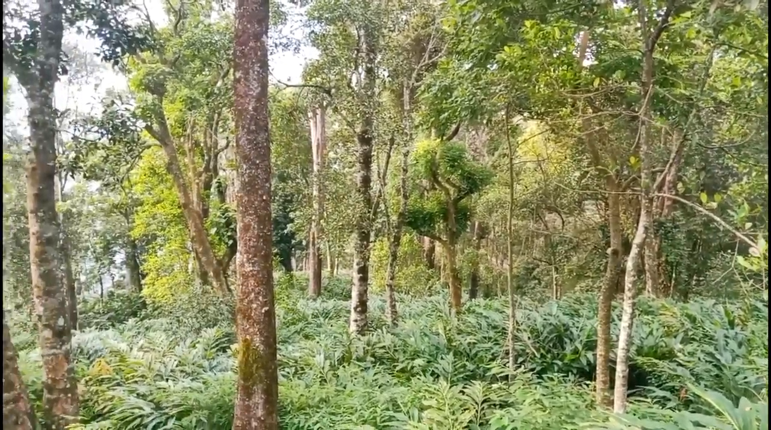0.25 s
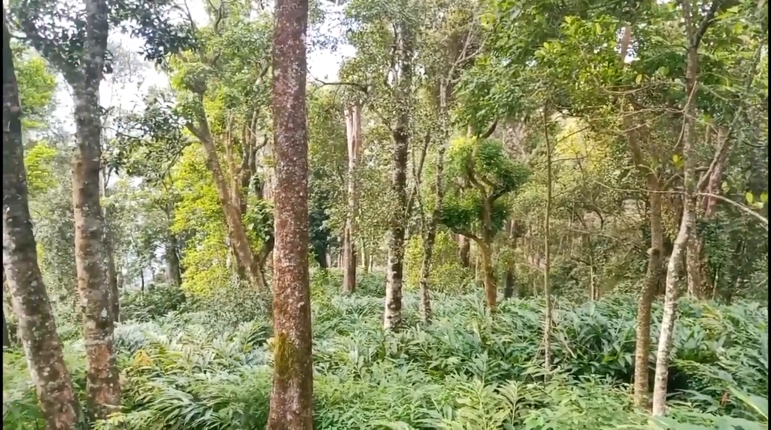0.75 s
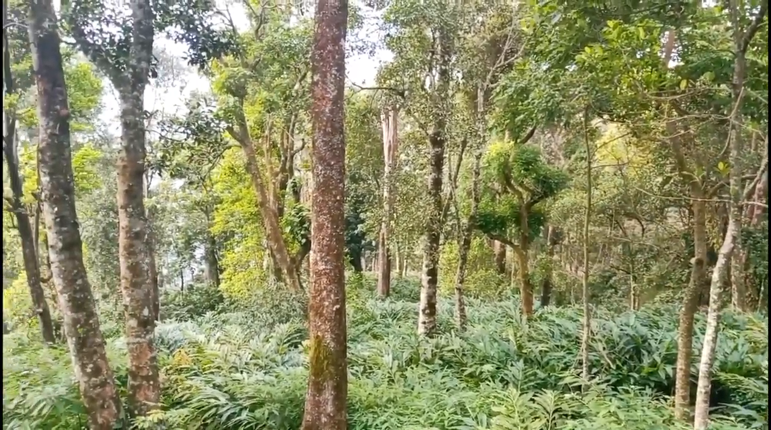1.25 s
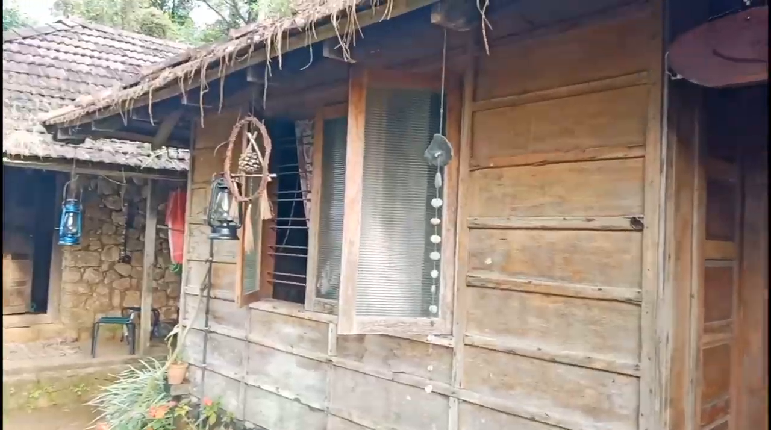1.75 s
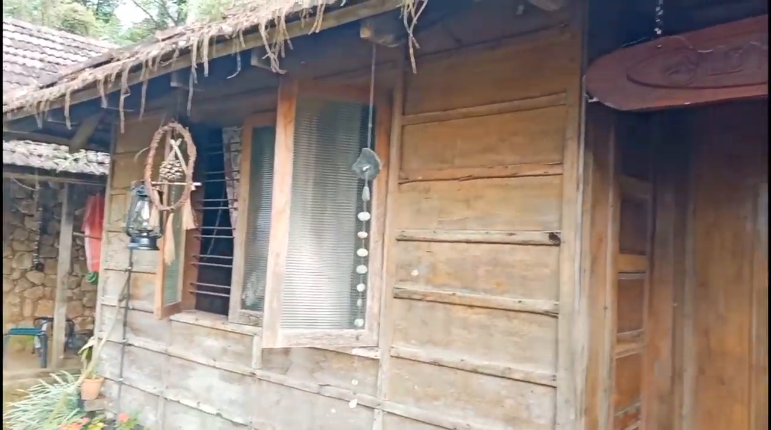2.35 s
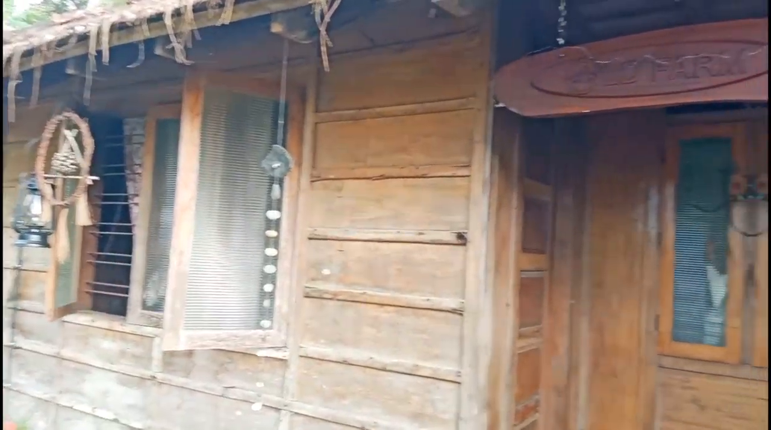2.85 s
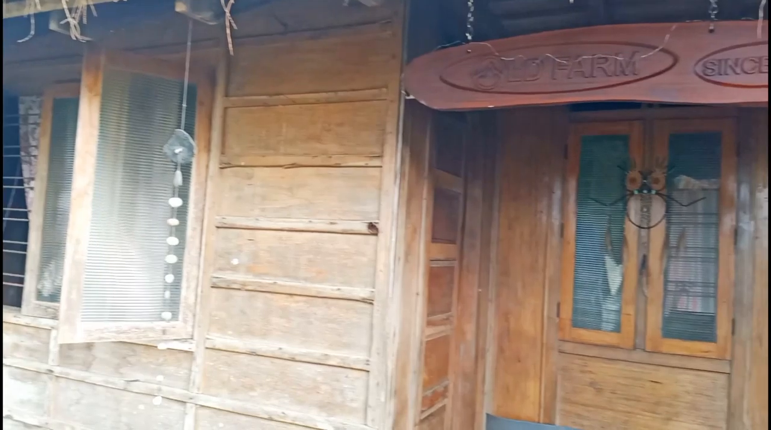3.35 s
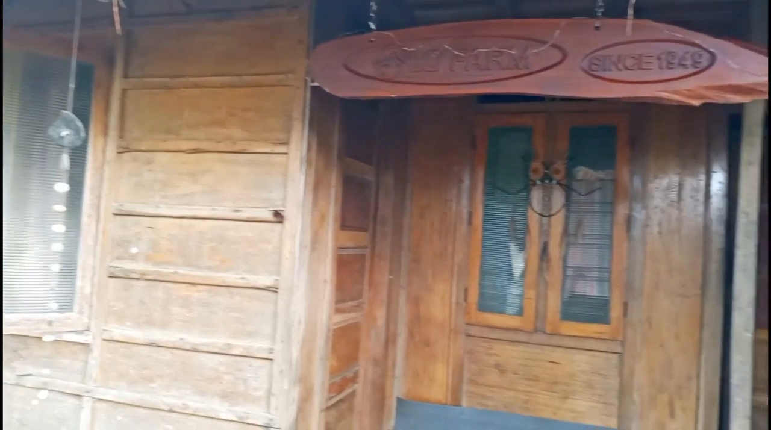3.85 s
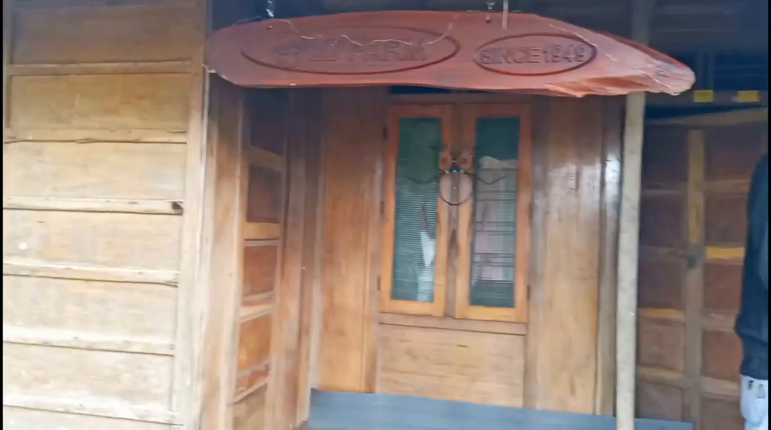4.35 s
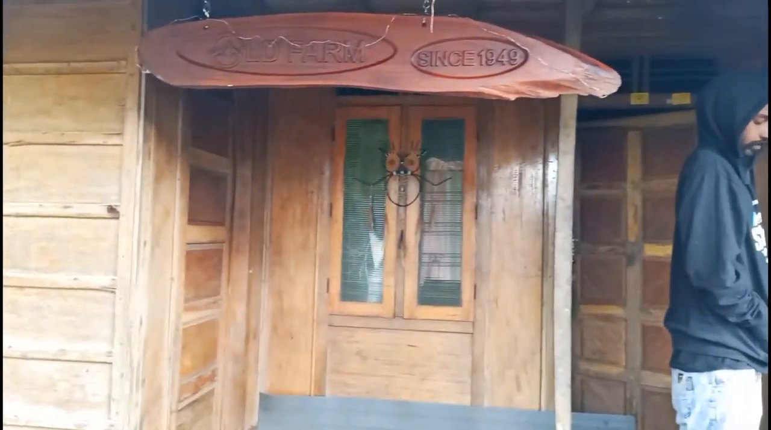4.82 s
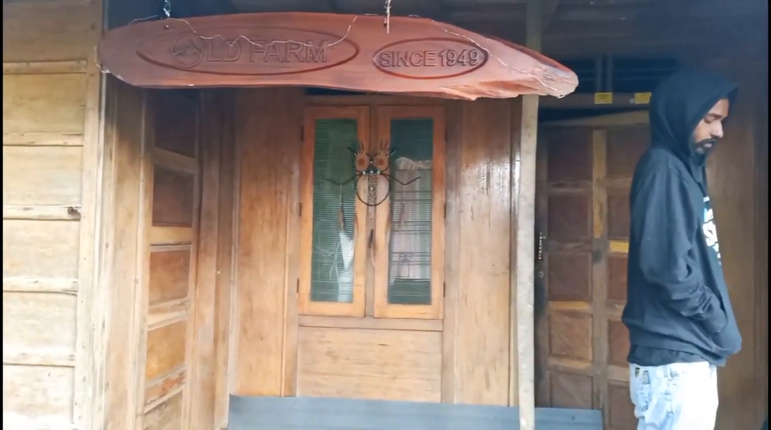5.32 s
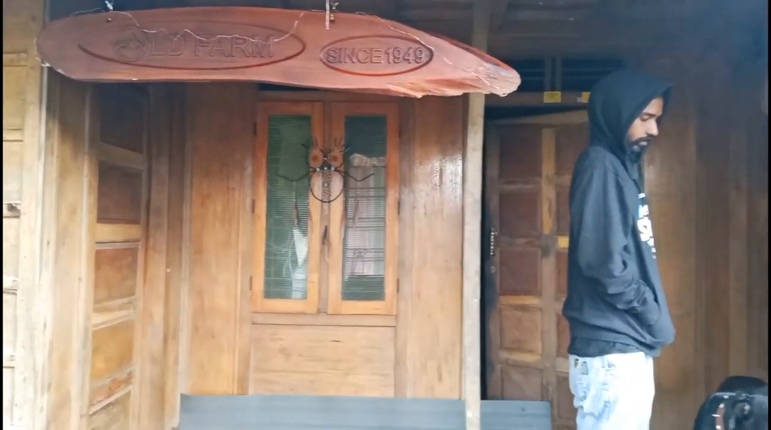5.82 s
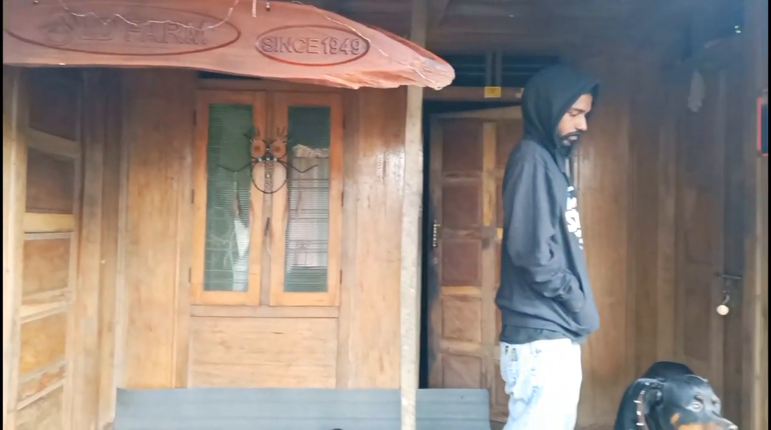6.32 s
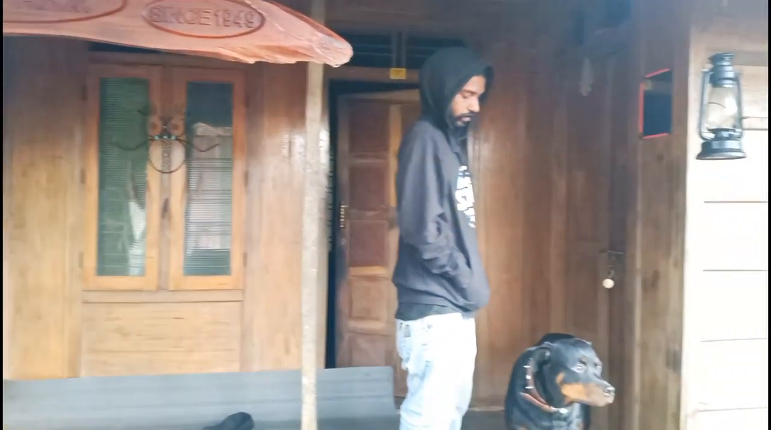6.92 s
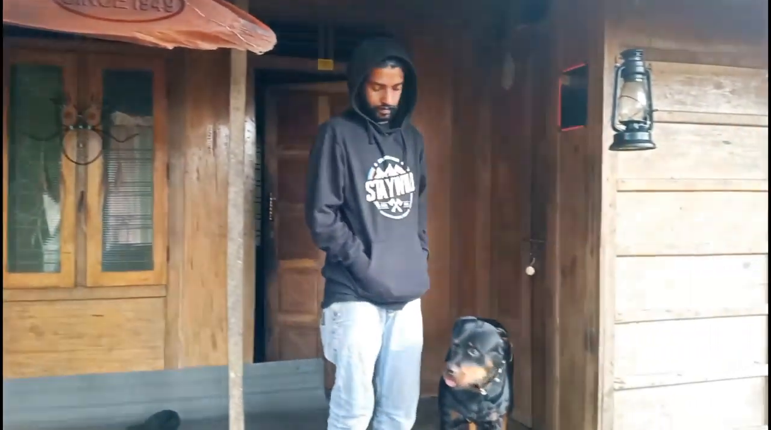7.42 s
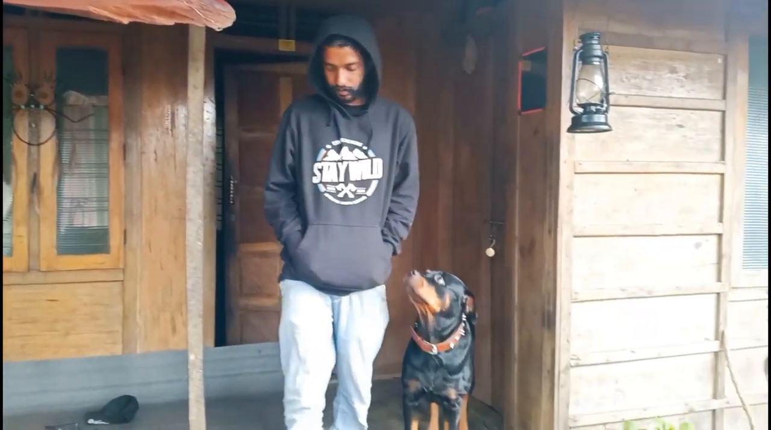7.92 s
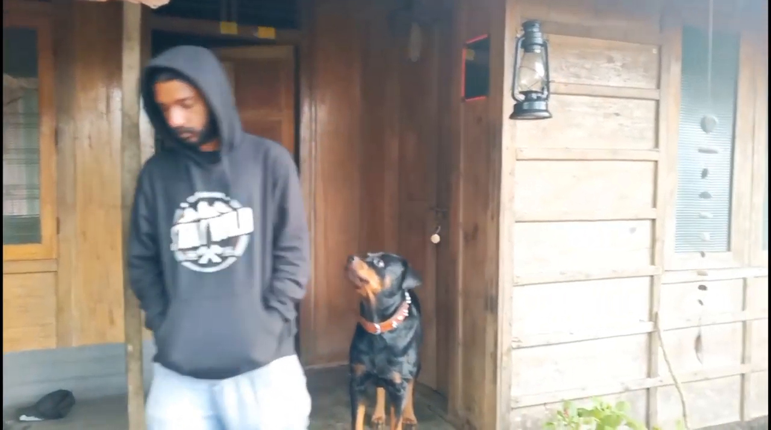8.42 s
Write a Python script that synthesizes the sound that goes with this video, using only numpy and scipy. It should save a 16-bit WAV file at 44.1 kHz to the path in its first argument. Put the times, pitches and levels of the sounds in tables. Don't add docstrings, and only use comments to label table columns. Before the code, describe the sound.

Outdoors, woodland birds whistle and coo with long airy reverberation, their far chorus growing until an abrupt cut. After a tiny gap, porch air and faint motor hum fade in. A wooden door bangs and rattles early, followed by sparse clicks, hollow knocks, cloth and shoe scuffs, and light claw pings beneath yard birds and a recurring rising songbird phrase. A double wooden footfall clacks close to the end, heard through a small handheld microphone.

```python
import sys
import numpy as np
from scipy import signal
from scipy.fft import rfft, irfft
from scipy.io import wavfile
from scipy.ndimage import uniform_filter1d, map_coordinates

SR = 44100
rng = np.random.default_rng(int(sys.argv[2]) if len(sys.argv) > 2 else 0)


def persist_wave(psi):
    counts = np.round(np.clip(psi, -1, 1) * 32767).astype(np.int16)
    wavfile.write(sys.argv[1], SR, np.atleast_2d(counts).T)


def voltage_ratio(level):
    return 10 ** (np.asarray(level, float) / 20)


N = 382343
T = np.arange(N) / SR
FOREST_END_S, PORCH_START_S, PORCH_FULL_S = 1.4705, 1.487, 1.86
# [f/Hz, t60/s]
TRUNKS = [(800, 1), (3000, 0.76), (7000, 0.51), (14000, 1)]


def unit(x):
    return x / np.sqrt(np.mean(x ** 2) + 1e-20)


def along(points, hz):
    f, value = np.transpose(points)
    return np.interp(np.log(hz + 1), np.log(f + 1), value)


def level_curve(points):
    s, db = np.transpose(points)
    return voltage_ratio(np.interp(T, s, db, left=-150, right=-150))


def wobble(rate):
    knots = rng.standard_normal(int(N * rate / SR) + 4)
    return map_coordinates(knots, [np.arange(N) * rate / SR])


def noise(spectrum, patchy_db=0):
    hz, _, z = signal.stft(rng.standard_normal(N + SR // 10), SR, nperseg=1024)
    patches = uniform_filter1d(rng.standard_normal(z.shape), size=4, axis=0)
    patches = unit(uniform_filter1d(patches, size=6, axis=1))
    gain = voltage_ratio(along(spectrum, hz)[:, None] + patchy_db * patches)
    return unit(signal.istft(z * gain, SR, nperseg=1024)[1][:N])


def hump(lo_hz, hi_hz):
    return [(lo_hz / 2, -50), (lo_hz, 0), (hi_hz, 0), (hi_hz * 1.5, -50)]


def add(track, s, sound):
    start = round(s * SR)
    track[start:start + len(sound)] += sound[:len(track) - start]


def whistle(length, hz, db, flutter_db=3):
    u = np.linspace(0, 1, round(length * SR))
    phase = 2 * np.pi * np.cumsum(hz(u)) / SR
    flutter = np.interp(u * length * 120, np.arange(40), rng.standard_normal(40))
    swell = np.abs(np.sin(np.pi * u ** 0.7)) ** 0.6
    return voltage_ratio(db + flutter_db * flutter) * swell * np.sin(phase)


def notes(table, flutter_db=3):
    x = np.zeros(N)
    for s, length, hz0, hz1, db in table:
        add(x, s, whistle(length, lambda u: hz0 + (hz1 - hz0) * u, db, flutter_db))
    return x


def glides(tables, slopes, waver_hz):
    x, waver = np.zeros(N), waver_hz * wobble(60)
    for table, slope in zip(tables, slopes):
        for s, length, hz, db in table:
            drift = waver[round(s * SR):]
            add(x, s, whistle(length, lambda u: hz + slope * length * (u - 0.5) + drift[:len(u)], db))
    return x


def ring(modes):
    t = T[:SR // 8]
    tones = sum(voltage_ratio(db - 60 * t / t60) * np.sin(2 * np.pi * hz * t) for hz, db, t60 in modes)
    return (1 - np.exp(-t / 0.00024)) * tones


def echo(x, t60s, wet_db):
    out, size = x.copy(), SR // 4
    for start in range(0, N, size):
        block = x[start:start + size]
        if np.abs(block).max() < 1e-7:
            continue
        hz, t, z = signal.stft(rng.standard_normal(SR * 3 // 4), SR, nperseg=256)
        decay = voltage_ratio(-60 * t / along(t60s, hz)[:, None])
        tail = signal.istft(z * decay, SR, nperseg=256)[1]
        add(out, start / SR, voltage_ratio(wet_db) * signal.fftconvolve(block, tail / np.linalg.norm(tail)))
    return out


def songbird():
    # [t/s after the phrase starts, length/s, start f/Hz, end f/Hz, level/dB]
    syllables = [(0, 0.014, 1856, 1785, -41.5), (0.014, 0.022, 2090, 2230, -49),
                 (0.054, 0.0256, 2243, 2525, -40.5), (.08, 0.055, 2474, 2570, -44),
                 (0.129, 0.0217, 2494, 2885, -36.5), (0.146, 0.028, 2940, 2970, -39.5),
                 (0.269, 0.016, 1850, 1810, -38.5), (0.284, 0.017, 2080, 2260, -43.5),
                 (.378, .012, 1450, 1700, -48), (0.383, 0.0294, 1680, 2390, -39),
                 (0.406, 0.0636, 2402, 2520, -41.5), (0.467, 0.026, 2520, 2920, -41),
                 (.488, 0.021, 2930, 2950, -44)]
    # [t/s, level/dB, extra level of the second half/dB]
    repeats = [
        (1.673, -2.5, 0.5),
        (4.569, -1, -1),
        (6.966, -1.5, -2),
    ]
    table = []
    for s, level, late in repeats:
        for after, length, hz0, hz1, db in syllables:
            table.append((s + after, length, hz0, hz1, db + level + late * (after > 0.25)))
    return notes(table, flutter_db=1.2)


def door():
    # [f/Hz, level/dB, t60/s]
    latch = [(900, -8, 0.01), (1500, -17, 0.008), (396, -16, 0.016), (3300, -26, .008)]
    # [f/Hz, level/dB, t60/s]
    bounce = [(2115, -7.5, 0.015), (1240, -14.5, 0.027)]
    # [t/s, low level/dB, high level/dB, rise over 60 dB/s, t60/s]
    jolts = [
        (1.998, -33, -40, 0.19, 0.047),
        (2.014, -23, -19, 0.0238, 0.085),
        (2.0488, -24, -20.5, 0.0127, 0.055),
        (2.074, -32, -56, 0.02, 0.054),
        (2.092, -41, -27.5, 0.13, 0.047),
        (2.102, -32, -20.5, 0.1326, 0.085),
        (2.116, -34.5, -28.5, 0.07, .2),
    ]
    thump_shape = np.exp(-((T - 2.0162) / 0.0047) ** 4)
    x = voltage_ratio(-8.5) * thump_shape * np.sin(2 * np.pi * 245 * (T - 2.0139))
    add(x, 2.0478, ring(latch))
    add(x, 2.0478 + 0.00163, ring(bounce))
    shapes = [voltage_ratio(-60 * np.maximum((s - T) / rise, (T - s) / t60)) for s, _, _, rise, t60 in jolts]
    low, high = voltage_ratio(np.array(jolts)[:, 1:3].T) @ shapes
    rattle = unit(voltage_ratio(3.9 * wobble(500)))
    wood = noise([(300, 7.5), (900, 9.5), (2200, 1.0), (4000, -6.5), (5800, -33.0), (8000, -26.5), (15000, -62)])
    return x + low * noise(hump(173, 390)) + high * rattle * wood


def knocks():
    # [t/s, peak level/dB, f/Hz]
    boards = [(1.945, -42, 620), (1.975, -40, 560), (2.955, -39, 635), (3.267, -45, 280), (3.39, -33, 492),
              (3.585, -33.5, 777), (3.604, -37, 512), (5.037, -40, 330), (5.631, -46, 376),
              (5.633, -49, 708), (6.572, -48, 480), (7.12, -46.5, 329), (6.319, -51, 270),
              (6.529, -48.5, 940), (6.593, -56, 386), (6.926, -36, 342), (7.476, -42, 314),
              (8.367, -36, 333), (8.371, -38, 202), (8.38, -34, 506), (8.416, -34, 494),
              (8.488, -47.5, 652)]
    x, puff, t = np.zeros(N), np.zeros(N), T[:SR // 8]
    for s, db, hz in boards:
        t60 = 0.074 * voltage_ratio(0.63 * (-37.5 - db))
        add(x, s, ring([(hz, db, t60), (hz * 1.67, db - 6.5, t60 * 0.31)]))
        add(puff, s, voltage_ratio(db - 6.0 - 60 * t / (1.8 * t60)) * (1 - np.exp(-t / 0.00073)))
    return x + puff * noise([(190, -21), (330, 1.5), (900, -5.5), (1800, -7.5), (3500, -15.5), (5500, -40.5)])


def pings():
    # [t/s, peak level/dB, f/Hz]
    bits = [(3.937, -33, 3470), (3.957, -32, 3300), (3.968, -37, 3020), (4.264, -43, 3000),
            (5.077, -42, 3800), (5.097, -44, 3200), (6.324, -40, 1800), (6.653, -48, 2830),
            (6.92, -45, 2900), (6.998, -34, 3000), (7.2275, -41, 3700), (7.3034, -34, 3700),
            (7.327, -42, 4070), (7.3557, -33.5, 4040), (7.371, -38, 3940), (7.386, -31, 4000),
            (7.413, -32, 3400), (7.437, -42, 3700), (8.409, -27, 3000)]
    # [t/s, peak level/dB, f/Hz, t60/s]
    footfall = [
        (8.366, -28.5, 330, .03),
        (8.366, -28, 1500, 0.017),
        (8.38, -22, 769, .04),
        (8.391, -27.5, 750, 0.033),
        (8.399, -24, 690, 0.025),
        (8.411, -32, 900, .03),
        (8.416, -35, 700, 0.037),
    ]
    x, t60_bit = np.zeros(N), 0.014
    for s, db, hz in bits:
        add(x, s, ring([(hz, db, t60_bit), (hz * 0.8, db - 6, t60_bit), (hz * 1.15, db - 12, t60_bit)]))
    for s, db, hz, t60 in footfall:
        add(x, s, ring([(hz, db, t60), (hz * 1.51, db - 10, t60 * 0.53), (hz * 2.27, db - 7.5, t60 * 0.57)]))
    return x


def ticks():
    # [t/s, peak level/dB, 2-5 kHz level/dB]
    claw_ticks = [(1.6532, -56, -47), (1.856, -44, -40), (2.577, -38, -42), (2.7024, -46, -40.5),
                  (3.165, -40, -24), (3.2146, -47, -37), (3.239, -40, -35.5), (3.385, -45, -39.5),
                  (3.576, -45, -42), (3.922, -43, -45), (3.9375, -39, -32), (3.9645, -39, -32),
                  (4.292, -44, -39.5), (4.482, -38, -32.5), (4.5257, -47, -43), (4.7277, -45, -39),
                  (5.0989, -37, -40), (5.292, -50, -43), (5.518, -39, -31.5), (5.816, -43.5, -33.5),
                  (5.839, -49, -42), (6.291, -43, -31), (6.593, -40, -29), (6.6522, -54, -44),
                  (7.2275, -51, -44), (7.3034, -63, -42), (7.3557, -49, -36), (7.386, -58, -37),
                  (7.4136, -49, -33), (7.451, -49, -46), (7.51, -54, -48), (5.45, -47, -52),
                  (5.62, -54, -52), (5.65, -51, -46), (5.804, -48, -41), (6.92, -42, -47),
                  (2.722, -48, -42), (7.7972, -57, -42)]
    # [t/s, peak level/dB, 2-5 kHz level/dB]
    door_ticks = [(2.013, -40, -34), (2.021, -32, -38), (2.05, -32, -26), (2.09, -43, -22.5),
                  (2.1, -40, -29), (2.112, -43, -32), (2.14, -46, -37)]
    # [t/s, peak level/dB, 2-5 kHz level/dB]
    step_ticks = [(8.3679, -56, -49), (8.3804, -51, -51), (8.408, -50, -38), (8.4268, -50, -46)]
    bright, mid, t = np.zeros(N), np.zeros(N), T[:SR // 20]
    for s, db, mid_db in claw_ticks + door_ticks + step_ticks:
        add(bright, s, voltage_ratio(db - 4.5 - 60 * t / 0.014) * (1 - np.exp(-t / 0.00069)))
        add(mid, s, voltage_ratio(mid_db - 2.0 - 60 * t / 0.044) * (1 - np.exp(-t / 0.0024)))
    bright_noise = noise([(4000, -14), (5800, -7.0), (8000, 2.0), (10500, -12.5), (14000, -6.0), (15800, -18)])
    mid_noise = noise([(1000, -22), (1900, -5.5), (3000, 3.0), (4200, -2.0), (5800, -36)])
    return bright * bright_noise + mid * mid_noise


def scuffs():
    # [centre t/s, half length/s, hiss level/dB, body level/dB]
    rubs = [(1.653, 0.026, -80, -56.5), (1.865, 0.031, -66, -64), (2.732, 0.022, -70, -62),
            (2.87, .015, -72.5, -71), (3.947, 0.03, -61, -59), (5.098, 0.055, -64.5, -62),
            (5.476, 0.025, -70.5, -74), (5.627, 0.019, -73, -52), (6.475, 0.049, -70, -56.5),
            (6.57, 0.055, -67.5, -52.5), (6.933, 0.053, -61, -47), (7.117, 0.052, -63, -51.5),
            (7.39, 0.051, -60, -61), (7.302, 0.047, -67.5, -64), (5.54, 0.025, -68.5, -70)]
    # [f/Hz, level/dB]
    hiss_colour = [(1000, 5), (2500, 14.5), (4000, 16), (5800, -2.5), (8000, 4.5), (10500, -12),
                   (14000, -6), (15800, -13)]
    hiss = sum(voltage_ratio(db) * np.exp(-((T - s) / half) ** 2) for s, half, db, _ in rubs)
    body = sum(voltage_ratio(db) * np.exp(-((T - s) / half) ** 2) for s, half, _, db in rubs)
    grit = unit(voltage_ratio(2.1 * wobble(180)))
    drag = unit(voltage_ratio(1.6 * wobble(60)))
    return voltage_ratio(13.5) * hiss * grit * noise(hiss_colour) + body * drag * noise(hump(127, 627))


def yard_birds():
    # [t/s, length/s, middle f/Hz, level/dB]
    falls = [(2.278, 0.0483, 3060, -49), (2.441, 0.077, 3054, -55.5), (4.315, .03, 2600, -55),
             (4.085, .04, 2570, -54), (2.53, 0.046, 2883, -53.5), (2.6, .04, 2960, -57),
             (5.98, .03, 3540, -56), (5.955, .02, 3520, -55), (5.609, 0.0864, 3273, -53),
             (5.639, 0.1, 2780, -56), (6.48, 0.03, 2474, -43.5), (6.72, 0.078, 3110, -59),
             (6.75, 0.013, 2970, -54), (7.567, 0.056, 3460, -58), (7.69, 0.024, 2980, -53)]
    # [t/s, length/s, middle f/Hz, level/dB]
    plunges = [(5.63, 0.0395, 2700, -56), (5.67, 0.041, 3000, -56), (3.109, 0.051, 2400, -52.5),
               (7.633, 0.0284, 2574, -46.5), (7.917, 0.0225, 2420, -46), (8.133, 0.068, 3060, -48.5)]
    # [t/s, length/s, middle f/Hz, level/dB]
    rises = [(3.756, 0.036, 2870, -59), (3.786, 0.057, 2730, -56), (4.008, 0.029, 2265, -52.5),
             (5.933, 0.021, 3500, -53), (6.522, 0.02, 2500, -64), (7.755, 0.045, 2310, -55),
             (7.854, .027, 3620, -64)]
    # [t/s, length/s, middle f/Hz, level/dB]
    holds = [(2.338, 0.065, 2760, -56), (2.353, 0.033, 1954, -49.5), (2.882, 0.073, 2967, -51),
             (3.026, .027, 2700, -51), (3.062, 0.06, 2900, -53), (2.785, 0.037, 3370, -53.5),
             (3.26, 0.08, 2880, -55.5), (3.7, .08, 3420, -59), (5.55, .2, 4400, -65),
             (3.385, 0.074, 2870, -56), (3.46, 0.149, 2600, -57), (3.849, 0.031, 2440, -47.5),
             (4.2, 0.056, 2550, -54.5), (3.995, 0.021, 2550, -55), (4.02, 0.014, 2300, -54),
             (4.125, 0.038, 2330, -56), (3.98, .015, 2230, -56), (4.431, 0.092, 2550, -57),
             (4.648, 0.079, 3710, -60), (5.49, 0.061, 2000, -56), (6.172, 0.065, 2880, -56.5),
             (6.205, .03, 2900, -57), (6.244, 0.026, 4110, -54), (6.248, .02, 3850, -55),
             (5.935, 0.055, 7550, -66), (2.19, 0.074, 8900, -74), (6.462, 0.13, 4220, -58.5),
             (6.649, .24, 4200, -62.5), (6.63, .06, 2160, -58), (6.76, .02, 2450, -54),
             (5.9, 0.027, 2380, -57), (7.81, .07, 3550, -61), (7.95, 0.082, 3550, -56),
             (7.7, .07, 3300, -60), (7.88, .04, 3540, -63), (8.315, .04, 2810, -63),
             (4.395, .04, 3150, -60)]
    slopes = (-4300, -9700, 5000, 698)
    # [t/s, length/s, start f/Hz, end f/Hz, level/dB]
    sweeps = [
        (7.502, .016, 2550, 2050, -50),
        (6.228, .024, 3150, 4050, -54),
    ]
    return voltage_ratio(1.5) * glides([falls, plunges, rises, holds], slopes, waver_hz=55) + notes(sweeps)


def warbles():
    # [t/s, length/s, start f/Hz, end f/Hz, level/dB]
    thin_notes = [(0.135, .16, 7070, 7600, -74), (2.42, .13, 7620, 6570, -70),
                  (2.936, 0.05, 7850, 8350, -66), (2.96, 0.14, 7700, 8050, -64),
                  (3.867, .05, 7700, 7150, -74), (5.448, 0.036, 6600, 6500, -65),
                  (3.304, 0.08, 8300, 8350, -77), (4.297, 0.076, 7460, 7450, -65.5),
                  (4.453, 0.094, 7250, 7280, -65.5), (4.789, 0.09, 7600, 7710, -68),
                  (5.0, 0.08, 7460, 7400, -68), (5.641, 0.081, 7100, 7000, -70),
                  (5.94, 0.06, 7620, 7800, -68), (7.628, 0.054, 7500, 7300, -80)]
    x, shiver = np.zeros(N), 220 * wobble(400)
    for s, length, hz0, hz1, db in thin_notes:
        swing_hz = 567 * voltage_ratio(0.82 * (db + 59.5))

        def pitch(u):
            swing = swing_hz * np.sin(2 * np.pi * 17 * length * u + 0.5)
            return hz0 + (hz1 - hz0) * u + swing + shiver[round(s * SR):][:len(u)]
        add(x, s, whistle(length, pitch, db, flutter_db=7.5))
    return x


def zigzags():
    # [t/s, f/Hz]
    calls = [
        [(4.752, 8000), (4.768, 8450), (4.786, 7050), (4.825, 8350), (4.86, 8500)],
        [(4.962, 8050), (4.99, 8650), (5.02, 7950), (5.036, 8400), (5.052, 7750), (5.1, 8450)],
    ]
    x = np.zeros(N)
    for s, hz in map(np.transpose, calls):
        length = s[-1] - s[0]
        add(x, s[0], whistle(length, lambda u: np.interp(s[0] + u * length, s, hz), -59.5))
    return x


def chips():
    # [t/s, top f/Hz, level/dB]
    upsweeps = [
        (0.3456, 7050, -31.5),
        (1.006, 7380, -29),
    ]
    x, snap = np.zeros(N), np.zeros(N)
    t, tail = T[:round(0.0066 * SR)], T[:SR // 10]
    for s, hz, db in upsweeps:
        phase = 2 * np.pi * np.cumsum(hz * (1 - 0.5 * np.exp(-(t / 0.00262) ** 2))) / SR
        swell = np.sin(np.pi * (t / t[-1]) ** 2.6) ** 0.75
        add(x, s, voltage_ratio(db) * swell * (np.sin(phase) + voltage_ratio(-30) * np.sin(2 * phase)))
        add(snap, s, voltage_ratio(db - 13 - 60 * tail / 0.12) * (1 - np.exp(-tail / 0.0012)))
    return x + snap * noise([(4500, -14), (5800, 3), (7200, 6.5), (8800, -4.5), (10500, -18),
                             (12000, -23), (14000, -15), (15500, -24)])


def forest_birds():
    # [t/s, length/s, middle f/Hz, level/dB]
    falls = [(.005, .04, 3700, -57), (.04, .07, 950, -55), (.215, .05, 3250, -56), (.09, .035, 3770, -60),
             (.115, 0.044, 3200, -51), (.21, 0.06, 3770, -51), (.31, .042, 3470, -49.5),
             (.36, .045, 3800, -51), (.365, 0.04, 3150, -47), (.405, .035, 2870, -55),
             (.43, 0.04, 3540, -48), (.46, 0.03, 3760, -48.5), (.47, .04, 3450, -48),
             (.65, .035, 3430, -46), (.685, .04, 3520, -48), (.87, 0.054, 3396, -46),
             (1.065, 0.0755, 3920, -44), (1.145, 0.03, 3800, -43), (1.1, .04, 3450, -45),
             (1.15, .04, 3480, -47), (1.125, .04, 3130, -53), (1.215, .025, 3600, -44)]
    # [t/s, length/s, middle f/Hz, level/dB]
    plunges = [(0, 0.061, 1980, -53), (.06, .04, 2900, -56), (.89, 0.035, 2250, -51)]
    # [t/s, length/s, middle f/Hz, level/dB]
    rises = [(.81, 0.03, 2270, -54), (.67, .04, 4900, -68), (.705, .035, 5300, -64), (.73, .05, 6000, -68),
             (.805, .04, 7400, -72), (1.195, .05, 3680, -46), (1.3, .04, 4000, -51),
             (1.41, 0.06, 3900, -48)]
    # [t/s, length/s, middle f/Hz, level/dB]
    holds = [(.835, .03, 2420, -51), (.875, 0.086, 2492, -52.5), (.7, .045, 3450, -51),
             (1.018, .025, 4220, -45), (.47, .05, 3720, -51), (.52, .06, 3500, -52),
             (1.405, .04, 5700, -68), (.83, .06, 3950, -56), (1.15, .05, 3250, -50), (1.28, .06, 3600, -51),
             (1.35, .05, 3750, -52), (1.425, .03, 4450, -59)]
    slopes = (-6500, -11000, 9004, -300)
    # [t/s, middle f/Hz, level/dB]
    dove = [(.528, 1060, -55), (.58, 1070, -58), (.925, 1060, -51), (.966, 1150, -43), (1.008, 1170, -43),
            (1.03, 1080, -45), (1.055, 1110, -44), (1.1, 1050, -50), (1.25, 1120, -52), (1.375, 1010, -55)]
    # [t/s, length/s, start f/Hz, end f/Hz, level/dB]
    sweeps = [
        (1.022, .052, 4200, 5050, -52),
        (.61, .065, 4000, 3330, -46),
    ]
    # [t/s, length/s, start f/Hz, end f/Hz, level/dB]
    droops = [
        (.715, .118, 6950, 4150, -65),
    ]
    # [t/s, length/s, start f/Hz, end f/Hz, level/dB]
    swoops = [
        (.936, .065, 5000, 7950, -66),
        (.93, .045, 5000, 6300, -65),
    ]
    coos = [(s, 0.034, hz, db) for s, hz, db in dove]
    x = glides([falls, plunges, rises, holds, coos], [*slopes, -8000], waver_hz=32) + notes(sweeps)
    for s, length, hz0, hz1, db in droops:
        add(x, s, whistle(length, lambda u: hz0 + (hz1 - hz0) * u ** 3.2, db))
    for s, length, hz0, hz1, db in swoops:
        add(x, s, whistle(length, lambda u: hz1 + (hz0 - hz1) * (1 - u) ** 3.5, db))
    return x


def flock(level, until, count, lo_hz, hi_hz):
    table = []
    for when, size, pitch, other in rng.random((count, 4)):
        hz = lo_hz + (hi_hz - lo_hz) * pitch
        table.append((when * until, 0.0306 + 0.054 * size, hz, hz * (0.93 + 0.0713 * other), -5 * size))
    return level * unit(echo(notes(table), TRUNKS, 21.0))


def rustle():
    # [t/s, level/dB]
    swell = [(1.6, -89), (1.89, -110), (4.99, -97), (5.26, -72.5), (8.67, -96)]
    crackle = unit(voltage_ratio(2.6 * wobble(300)))
    colour = [(3500, -21), (4800, 8.5), (6500, -1.0), (10000, -9.0), (14000, -20)]
    return voltage_ratio(6.5) * level_curve(swell) * crackle * noise(colour, patchy_db=0.5)


def hum():
    band = voltage_ratio(-65.5) * noise([(950, -15), (1090, 9.0), (1210, 5.0), (1350, -28.0)])
    turn = 2 * np.pi * np.cumsum(86 + 1.8 * wobble(6)) / SR
    motor = voltage_ratio(-56 + 2.0 * wobble(6.8)) * np.sin(turn)
    overtone = voltage_ratio(-62.5 + 3.5 * wobble(5)) * np.sin(2 * turn)
    return band + motor + overtone


def porch():
    # [f/Hz, t60/s]
    garden = [(1700, 0.4), (2600, 0.89), (8000, 0.56)]
    # [f/Hz, t60/s]
    yard = [(200, 0.51), (2500, 0.88), (8000, 0.75), (14000, 0.66)]
    # [t/s, level/dB]
    far_flock = [(1.5, -102), (2.08, -54), (4.02, -102.5), (7.89, -59.5), (8.67, -73.5)]
    # [f/Hz, level/dB per Hz]
    air_colour = [(15, -46), (25, -14), (37, -16), (64, 1.5), (110, 1), (879, -15.5), (1120, -13.5),
                  (1470, -17.5), (3480, -16), (4810, -25.5), (5810, -41), (7810, -32.5), (10500, -56),
                  (13800, -40.5), (15800, -75)]
    birds = echo(songbird(), garden, -0.27) + echo(yard_birds(), yard, -3)
    birds = birds + echo(warbles() + zigzags(), yard, 4.0)
    near = echo(door(), yard, -15.0) + echo(knocks() + pings(), yard, -13.0)
    near = near + echo(ticks() + scuffs(), yard, -9)
    far = flock(voltage_ratio(4.5) * level_curve(far_flock), until=T[-1], count=700, lo_hz=3200, hi_hz=3700)
    rise = np.clip(0.2 + (T - PORCH_START_S) / (PORCH_FULL_S - PORCH_START_S), 0, 1)
    fade = (T > PORCH_START_S) * rise
    air = voltage_ratio(-50.5 + 0.27 * wobble(2.9)) * noise(air_colour, patchy_db=2.0)
    return birds + near + far + rustle() + fade * (air + fade * hum())


def forest():
    # [t/s, modes [f/Hz, level/dB, t60/s]]
    twig = (1.098, [(14100, -60, .04), (13200, -65, .03)])
    # [t/s, level/dB]
    chorus = [(0.0, -60), (0.2, -60), (.45, -52), (.7, -51), (.85, -47), (1.05, -46), (1.2, -43),
              (1.35, -49), (1.47, -42)]
    # [f/Hz, level/dB per Hz]
    air_colour = [(15, -41), (25, 1), (179, 0), (424, -9), (1120, -12.5), (1430, -15), (2590, -13),
                  (3210, -10.5), (3870, -12.5), (5970, -35.5), (7600, -27), (8700, -42.5), (15800, -52)]
    birds = voltage_ratio(1.1) * echo(forest_birds(), TRUNKS, 1.5) + echo(chips(), TRUNKS, 2.9)
    add(birds, twig[0], ring(twig[1]))
    far = flock(voltage_ratio(-12.0) * level_curve(chorus), until=FOREST_END_S, count=320, lo_hz=3100, hi_hz=4110)
    insect = voltage_ratio(-84 + 2.2 * wobble(30)) * np.sin(2 * np.pi * 14400 * T)
    air = voltage_ratio(-48.0) * noise(air_colour, patchy_db=1.5)
    return birds + far + insect + air


def scene():
    return (forest() * (T < FOREST_END_S) + porch() * (T > PORCH_START_S))[None]


def roll_off(x):
    return signal.sosfilt(signal.butter(12, 15900, fs=SR, output="sos"), x)


def record(dry):
    bass_cut = signal.butter(3, 62, "highpass", fs=SR, output="sos")
    spectrum = rfft(signal.sosfilt(bass_cut, dry))
    spectrum[:, np.fft.rfftfreq(N, 1 / SR) > 15650] = 0
    return roll_off(irfft(spectrum, N))


dry = scene()
out = record(dry)
persist_wave(out)
```